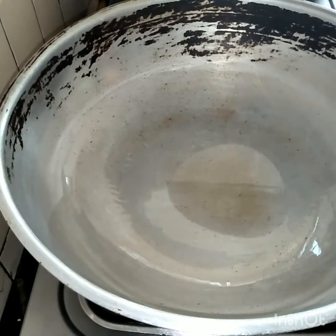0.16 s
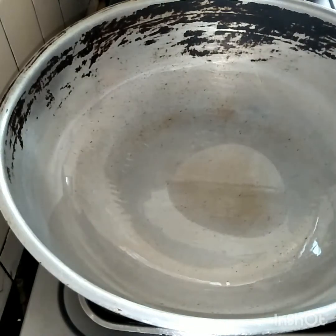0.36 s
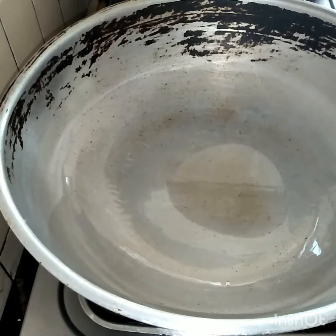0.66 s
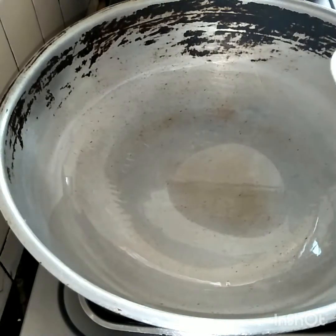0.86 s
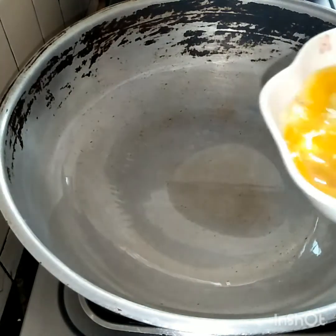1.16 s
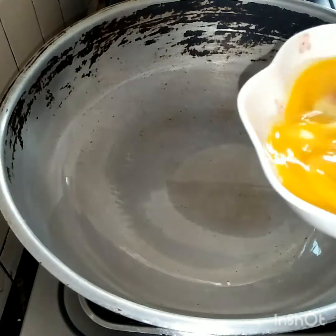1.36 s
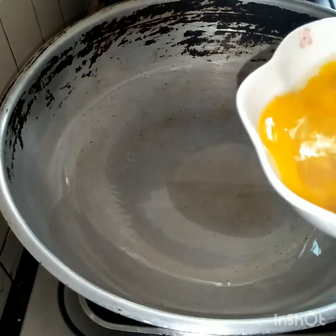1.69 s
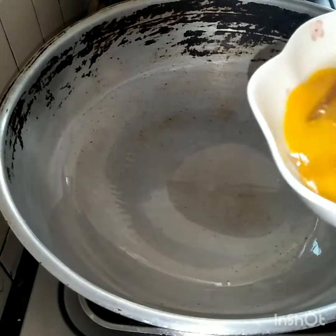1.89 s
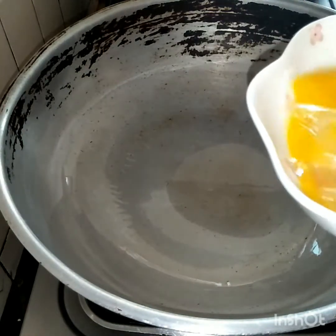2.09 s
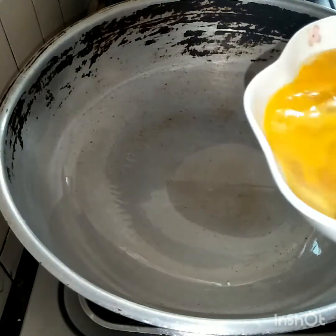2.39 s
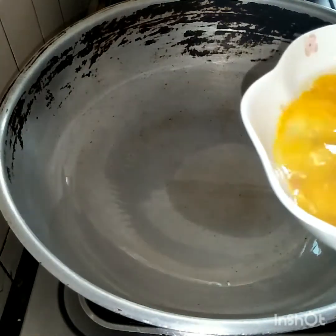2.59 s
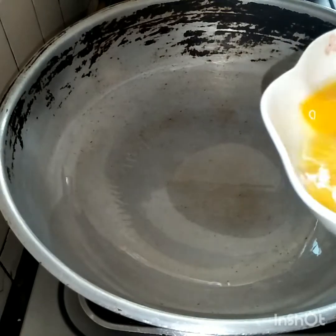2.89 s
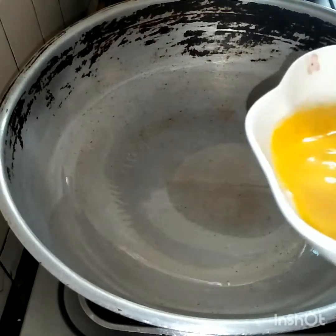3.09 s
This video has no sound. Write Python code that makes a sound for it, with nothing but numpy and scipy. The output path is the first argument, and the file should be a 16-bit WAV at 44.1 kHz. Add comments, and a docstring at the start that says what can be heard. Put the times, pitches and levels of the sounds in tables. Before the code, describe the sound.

First a muffled clatter further off and a faint high clink, then close, quick chopstick clacks on an egg-filled bowl with squelches and bubbles, in a small reverberant kitchen over low rumble and hum.

```python
"""Chopsticks beat raw eggs in a small ceramic bowl held over a wok, about six strokes a second.
Each stroke excites the damped modes of the bowl with two impacts and a brief noisy scrape.
Air pockets plop as gliding decaying tones; bubbles, squelches and tiny wet ticks fill in the egg.
A dish clinks in high modes, a clatter of coloured noise opens the scene further off, and thuds are soft.
The tiled kitchen adds echoes and a tail over wavering low hum, rumble and hiss."""
import sys
import numpy as np
from scipy import signal
from scipy.fft import rfft, irfft
from scipy.io import wavfile
from scipy.ndimage import uniform_filter1d

SR = 44100
rng = np.random.default_rng(int(sys.argv[2]) if len(sys.argv) > 2 else 0)


def materialize(psi):
    """Save the field psi as 16-bit PCM at rate SR to the path in sys.argv[1].

    A 1-D psi becomes a single channel; in a 2-D psi each row is a channel.
    """
    bounded = np.clip(np.atleast_2d(psi).T, -1, 1)
    quanta = np.round(bounded * 32767).astype(np.int16)
    wavfile.write(sys.argv[1], SR, quanta)


N = 143325  # length [samples]

# Levels are relative, ahead of the common gains (names in _DB) of each source.
# Chopstick strokes: t/s, stirring force/dB, level/dB in each of five bands,
# lowest bowl mode f/Hz, second stick level/dB, scrape level/dB
STROKES = [(0.806, -17, -41.5, -30.5, -28, -28, -35, 1196, 10, -1.5),
           (0.998, -15.5, -37.5, -32, -31, -29, -32.5, 1280, -5, -16),
           (1.202, -23, -88, -40.5, -33.5, -35, -42, 950, -2, -11),
           (1.35, -33, -47, -29.5, -29, -30, -39, 1190, -6.5, -32),
           (1.496, -9.5, -53.5, -34, -25.5, -33, -39, 974, -21, -28),
           (1.65, -15, -36, -28.5, -29, -30, -36, 1127, -11, -36),
           (1.818, -16.5, -32, -30, -40.5, -33, -36, 1265, -25, -22.5),
           (1.908, -15.5, -40.5, -37.5, -34, -37, -45.5, 1244, 4.5, -28),
           (1.994, -25, -33.5, -33, -28, -28, -45, 1094, -14, -17),
           (2.154, -16.5, -57, -36.5, -31, -35, -40.5, 1350, -11, -42),
           (2.305, -22, -78, -30, -27, -29.5, -36.5, 1270, 4, -28),
           (2.463, -10.5, -42, -28.5, -25.5, -27.5, -29, 1200, -5.5, -44),
           (2.621, -8, -47, -37, -31.5, -32, -41, 1265, 1, -36),
           (2.645, -12, -42.5, -39.5, -28.5, -33, -44, 1303, -2, -17.5),
           (2.783, -10.5, -45, -32, -32, -27.5, -32.5, 1340, -5, -17),
           (2.957, -13, -38.5, -27, -29.5, -27, -36.5, 995, 2.5, -46),
           (3.046, -25, -48.5, -46, -42.5, -43, -59, 1290, -21, -44),
           (3.125, -7, -39, -28.5, -27.5, -22.5, -28, 980, 2, -27)]
# Nominal edges of those five bands: f/Hz
STROKE_EDGES_HZ = [870, 1500, 2500, 3800, 7000, 16000]
STROKE_DB, SECOND_STICK_S, SCRAPE_S, ONSET_S = -4.5, 0.0039, 0.0024, 0.002
# Modes of the filled bowl, above the lowest one, which moves with the egg: f/Hz, level/dB, t60/s
BOWL_MODES = [(1828, -12.5, 0.062), (1926, -2, 0.027), (2110, -4.5, 0.025), (2948, 1, 0.023),
              (3260, -2, 0.037), (4620, -0.5, 0.012), (4910, 1.5, 0.012), (6240, -6, 0.0065)]
LOW_MODE_DB, LOW_MODE_T60_S = -9.5, 0.032
# Spectrum of the hard tick of wood on glaze: f/Hz, level/dB
TICK_COLOUR = [(800, -24.5), (3000, -22), (6000, -3), (7200, -9), (8300, 1), (9300, -1.5), (11200, -4.5),
               (12800, 6.5), (14200, -4), (16000, -7)]
TICK_DB, TICK_S = 6, 0.00089

# Small wet ticks between strokes: t/s, level/dB
DRIPS = [(1.212, -40), (1.2449, -37.5), (1.279, -36), (1.5233, -36), (1.980, -50), (2.021, -53),
         (2.140, -40), (2.1858, -43), (2.4954, -38), (2.531, -45), (2.8136, -40), (2.832, -35),
         (2.988, -35)]
# Spectrum of a wet tick: f/Hz, level/dB
DRIP_COLOUR = [(500, -40), (2000, -25), (4800, 10.5), (7500, -10), (13000, -3), (16000, -20)]
DRIP_S = 0.0015
# Air pockets in the egg: t/s, starting pitch f/Hz, level/dB, t60/s, initial relative pitch rise/(1/s)
PLOPS = [(1.002, 1795, -13.5, 0.029, 2.5), (1.029, 4280, -21.5, 0.023, 6), (1.244, 1930, -17, 0.053, 6.5),
         (1.2445, 2530, -8.5, 0.014, 4), (1.280, 3260, -13.5, 0.018, 18), (1.358, 1634, -25, 0.046, -8),
         (1.404, 2974, -20, 0.026, -2.5), (1.707, 1810, -21.5, 0.045, 8), (1.715, 2690, -23.5, 0.062, 5),
         (1.799, 1860, -31, 0.034, 1), (1.817, 1300, -21, 0.0067, 1), (1.829, 1324, -17.5, 0.025, 10),
         (1.9358, 1282, -12, 0.025, -1.5), (1.971, 2070, -24, 0.034, 33), (1.979, 3050, -4.5, 0.01, 13),
         (2.004, 1038, -23, 0.039, -3), (2.098, 3330, -14.5, 0.019, 10), (2.530, 2080, -18, 0.012, 4.2),
         (2.533, 4590, -17.5, 0.013, 5), (2.659, 2760, -7, 0.013, -7), (2.664, 4750, -23, 0.023, 1),
         (2.705, 1703, -29, 0.049, -1), (2.815, 4620, -24, 0.027, 2), (2.833, 4700, -13, 0.011, 5),
         (2.948, 1946, -24.5, 0.056, 2.7), (2.946, 2650, -27, 0.049, 1), (2.987, 2820, -22.5, 0.022, 3.8),
         (3.07, 1894, -26, 0.042, 1)]
PLOP_DB, PLOP_ATTACK_S, PLOP_GLIDE_S, PLOP_ROUGH = -2, 0.0017, 0.02, 0.25
# Spectrum of the snapping film of egg: f/Hz, level/dB
SNAP_COLOUR = [(300, -10), (1500, -30), (3000, 21.5), (5000, 4.5), (7000, -17), (13000, -2.5), (16000, -21)]
SNAP_DB, SNAP_S = -20, 0.0058
# Spectrum of the sloshing egg: f/Hz, level/dB
SLOSH_COLOUR = [(300, -13), (1000, -42), (1500, -24), (1900, 13.5), (2450, -14), (3100, 10), (3800, -6),
                (4800, 3), (7000, -15), (10000, -13.5), (13000, -20), (16000, -43)]
SLOSH_DB, SLOSH_REST_DB, BUBBLES_PER_S = -37.5, -34, 1300
SLOSH_LAG_S, SLOSH_WIDTH_S = 0.039, 0.029
# Squelches, clusters of tiny rising bubbles: t/s, length/s, centre f/Hz, level/dB
SQUELCHES = [(1.028, 0.075, 1850, -46.5), (1.274, 0.075, 3810, -40), (1.518, 0.019, 4340, -47),
             (1.687, 0.028, 4320, -42), (1.822, 0.097, 1670, -35), (2, .022, 1320, -46),
             (2.099, 0.0072, 3530, -25), (2.184, 0.023, 3340, -35.5), (2.489, 0.076, 2980, -58),
             (2.647, 0.023, 4400, -31), (2.672, 0.062, 1720, -44.5), (2.806, 0.027, 5200, -35.5),
             (2.968, 0.032, 2310, -35)]
SQUELCH_DB, SQUELCH_PER_S, SQUELCH_RISE_PER_S = -7.5, 900, 16.6
SQUELCH_SPREAD, SQUELCH_CYCLES = 0.136, 10  # pitch spread in log f; decay time in cycles

# Light clinks of a dish: t/s, level/dB, attack/s
CLINKS = [(0.4705, -28.5, 0.0026), (0.734, -46, 0.0095), (0.95, -53, 0.0012), (2.591, -42.5, 0.0014)]
# Modes of the dish: f/Hz, level/dB, t60/s
DISH_MODES = [(2990, -18, 0.11), (3637, 1.5, 0.049), (3884, 5, 0.046), (4770, -5.5, 0.089), (5200, 5, 0.05),
              (5460, 3, 0.067), (5560, 13, 0.038), (5730, 8, 0.038), (9700, 3, 0.025), (11200, 6.5, 0.024),
              (12700, 13, 0.027)]
# Distant clatter: t/s, level/dB, rise/s, decay/s, tilt/(dB per octave), factor on the colour's f
CLATTER = [(-.02, -25, 0.014, 0.04, -5.5, 0.89), (0.06, -33, 0.02, 0.02, -9, 0.88),
           (0.191, -21.5, 0.015, 0.032, 2.5, 1), (0.254, -34, 0.0056, 0.032, -2, 0.96),
           (.300, -38.5, 0.0029, 0.018, 1.5, 1)]
# Spectrum of the clatter at factor 1: f/Hz, level/dB
CLATTER_COLOUR = [(60, -38), (150, -11), (280, -7.5), (560, -11), (720, -2.5), (1050, 2), (1450, -6.5),
                  (1900, -1), (2500, -9.5), (3200, -9.5), (4200, -12.5), (5200, -16), (7000, -27),
                  (10700, -32), (16000, -48)]
# Resonances of the clatter: f/Hz, width/Hz, peak level/dB
CLATTER_RINGS = [(785, 55, 0), (1063, 21, 10.5), (1141, 55, 9), (2006, 23, 7), (2616, 57, 9.5),
                 (2744, 58, 5.5), (3415, 26, 7.5), (5200, 25, 5)]
# Soft low thuds: t/s, level/dB
THUDS = [(0.207, -38.5), (.240, -35), (0.289, -43), (0.852, -50), (1.635, -49), (1.791, -51.5)]
# Spectrum of a thud: f/Hz, level/dB
THUD_COLOUR = [(40, -13), (90, 11), (170, -0.5), (260, 9), (400, -21), (800, -40), (16000, -90)]
THUD_RISE_S = 0.011

# Decay and colour of the kitchen's reverberation: f/Hz, t60/s, level/dB
ROOM = [(298, 0.28, 1), (1060, 0.19, -2.5), (1850, 0.25, -4.5), (2500, 0.15, 0), (3220, 0.38, -9),
        (4470, 0.43, -13), (7700, 0.51, -17.5), (12800, 0.28, -10)]
ECHO_DB, ECHO_S, ROOM_ONSET_S = -7.5, 0.013, 0.024
CLINK_ROOM_DB, CLATTER_ROOM_DB, ROOM_WIDTH_DB = 3.5, -5, -9
# Share of the room's sound scattered into a grainy wash: f/Hz, share (0-1)
DIFFUSION = [(2800, 0), (3600, .12), (5000, .15), (6300, .7), (16000, .9)]
GRAIN_DB = 1.3
# Mains hum, relative to its swell: f/Hz, level/dB
HUM = [(60, 1.5), (120, -12.5), (241, -22.5)]
# Swell of the hum: t/s, level/dB
HUM_SWELL = [(0.0, -39), (0.11, -35.5), (0.38, -53), (0.4, -43), (0.63, -33), (0.7, -46), (1.13, -36.5),
             (1.18, -44.5), (1.7, -38.5), (1.76, -47.5), (1.87, -37.5), (1.92, -45.5), (2.37, -36.5),
             (2.43, -50), (2.71, -36), (2.93, -45.5), (3.18, -37.5), (3.25, -41)]
HUM_WAVER_DB, HUM_WAVER_HZ, HUM_DRIFT_RAD = 2, 8.1, 0.47
# Spectrum of the rumble and hiss: f/Hz, level/dB
FLOOR_COLOUR = [(20, -22), (35, 7.5), (55, 2.5), (90, 5), (160, 4.5), (210, -7), (280, -17), (380, -22),
                (600, -23.5), (1200, -27), (2500, -30.5), (5000, -42.5), (10000, -43.5), (16000, -38.5)]
FLOOR_DB = -44
# Stereo width: f/Hz, side level/dB
WIDTH = [(2800, -80), (4000, -35), (5200, -11), (6500, -5), (16000, -6)]
EDGE_HZ = 16000


def amp(db):
    """Amplitude gain follows from level as 10^(level/20)."""
    return 10 ** (np.asarray(db) / 20)


def unit(x):
    """Normalisation to unit root-mean-square amplitude."""
    return x / np.sqrt(np.mean(x ** 2) + 1e-20)


def read(points, hz):
    """Linear interpolation on a logarithmic frequency axis."""
    f, value = np.transpose(points)
    return np.interp(np.log(hz + 1), np.log(f + 1), value)


def colour(x, points, tilt_db=0):
    """Spectral weighting by a table, with an added tilt per octave."""
    hz = np.fft.rfftfreq(x.shape[-1], 1 / SR)
    level_db = read(points, hz) + tilt_db * np.log2((hz + 200) / 1000)
    return irfft(rfft(x) * amp(level_db), x.shape[-1])


def add(mix, s, sound):
    """Linear superposition of a sound from time s on."""
    part = mix[..., max(round(s * SR), 0):][..., :sound.shape[-1]]
    part += sound[..., :part.shape[-1]]


def wander(hz):
    """Slow random fluctuation: noise under a Gaussian low-pass, without its mean."""
    f = np.fft.rfftfreq(N, 1 / SR)
    lowpass = np.exp(-(f / hz) ** 2) * (f > 0)
    return unit(irfft(rfft(rng.standard_normal(N)) * lowpass, N))


def ring(modes, t, spread=0.018, vary_db=2.5):
    """Modal superposition: damped sines, a little different in pitch and strength at each touch."""
    out = np.zeros(len(t))
    for hz, db, t60 in modes:
        touch_db = db + vary_db * rng.standard_normal()
        touch_hz = hz * (1 + spread * rng.standard_normal())
        out += amp(touch_db - 60 * t / t60) * np.sin(2 * np.pi * (touch_hz * t + rng.random()))
    return out


def chopsticks():
    """Impact excitation: noise swells briefly, then two impacts and a scrape ring the bowl's modes."""
    out, t = np.zeros((2, N)), np.arange(4096) / SR
    lead = 256  # samples of rising noise before the first impact
    since = t - lead / SR
    for s, _, *levels, low_hz, second_db, scrape_db in STROKES:
        # excitation: noisy onset and scrape, with an impulse for each stick
        envelope = np.exp(-np.maximum(since / SCRAPE_S, -since / ONSET_S))
        contact = amp(scrape_db) * rng.standard_normal(len(t)) * envelope
        contact[lead] += 1
        second_s = lead / SR + SECOND_STICK_S * rng.uniform(0.555, 1.2)
        add(contact, second_s, amp(second_db) * np.array([.5, .5]))

        modes = [(low_hz, LOW_MODE_DB, LOW_MODE_T60_S), *BOWL_MODES]
        body = np.array([ring(modes, t), ring(modes, t)])
        ringing = signal.fftconvolve(body, contact[None], axes=1)[:, :len(t)]

        # the tick follows the excitation, smoothed by a decaying memory
        pressure = np.sqrt(signal.lfilter([1], [1, -np.exp(-2 / (TICK_S * SR))], contact ** 2))
        tick = unit(colour(rng.standard_normal(body.shape), TICK_COLOUR)) * pressure
        clack = ringing + amp(TICK_DB) * tick

        # each band is set to its own level
        for lo, hi, db in zip(STROKE_EDGES_HZ, STROKE_EDGES_HZ[1:], levels):
            band_filter = signal.butter(3, [lo * 1.05, hi * .95], "band", fs=SR, output="sos")
            band = signal.sosfilt(band_filter, clack)
            band = band / band[:, :1024].std(1, keepdims=True)
            add(out, s - lead / SR, amp(db + STROKE_DB) * band)
    return out


def drips():
    """Impulsive noise: threads of egg snap and droplets tick on the bowl, dying exponentially."""
    out, t = np.zeros((2, N)), np.arange(1024) / SR
    for s, db in DRIPS:
        tick = colour(rng.standard_normal((2, len(t))), DRIP_COLOUR)
        add(out, s, amp(db) * unit(tick) * np.exp(-t / DRIP_S))
    return out


def plops():
    """Bubble resonance: a film of egg snaps and the air pocket rings roughly, gliding in pitch."""
    out, t = np.zeros((2, N)), np.arange(3000) / SR
    for s, hz, db, t60, rise in PLOPS:
        # the glide levels off after PLOP_GLIDE_S
        pitch = hz * (1 + rise * PLOP_GLIDE_S * np.tanh(t / PLOP_GLIDE_S))
        envelope = amp(-60 * t / t60) * (1 - np.exp(-t / PLOP_ATTACK_S))
        roughness = unit(uniform_filter1d(rng.standard_normal(len(t)), size=50))
        tone = np.sin(2 * np.pi * np.cumsum(pitch) / SR) * envelope * (1 + PLOP_ROUGH * roughness)
        snap_noise = unit(colour(rng.standard_normal((2, len(t))), SNAP_COLOUR))
        snap = amp(SNAP_DB) * snap_noise * np.exp(-t / SNAP_S)
        add(out, s, amp(db + PLOP_DB) * snap)
        add(out[0], s, amp(db + PLOP_DB) * tone)
    return out


def slosh(size_db=3, follow=0.72, full_db=-4):
    """Random impulse train: tiny bubbles crackle as the sticks drag through the egg after each stroke."""
    t = np.arange(N) / SR
    drags = []
    for s, force_db, *_ in STROKES:
        pulse = np.exp(-((t - s - SLOSH_LAG_S) / SLOSH_WIDTH_S) ** 2)
        drags.append(amp(follow * (force_db - full_db)) * pulse)
    # a steady remainder fades in over 0.47 s from the first stroke
    rest = amp(SLOSH_REST_DB) * np.clip((t - STROKES[0][0]) / 0.47, 0, 1)
    drag = np.max(drags, axis=0) + rest
    bursts = rng.random(N) < BUBBLES_PER_S / SR
    sizes = amp(size_db * np.minimum(rng.exponential(1, N), 3))
    pops = bursts * sizes * rng.choice([-1, 1], (2, N))
    return amp(SLOSH_DB) * drag * unit(colour(pops, SLOSH_COLOUR))


def squelches():
    """Bubble chirps: egg pulled by the sticks tears into clusters of bubbles, each rising in pitch."""
    out, t = np.zeros(N), np.arange(1024) / SR
    for s, length, centre_hz, db in SQUELCHES:
        cluster, draws = np.zeros(8192), rng.random((64, 3))
        count = max(int(SQUELCH_PER_S * length), 2)
        for when, pitch, size in draws[:count]:
            hz = centre_hz * np.exp(SQUELCH_SPREAD * (4 * pitch - 2))
            life = t * hz / SQUELCH_CYCLES
            chirp = np.sin(2 * np.pi * hz * (t + SQUELCH_RISE_PER_S * t ** 2 / 2))
            envelope = np.exp(-life) * np.minimum(life * 2, 1)
            add(cluster, when * length, (.5 + size) * chirp * envelope)
        # equal energy per second of cluster length
        cluster *= np.sqrt(length * SR / np.sum(cluster ** 2))
        add(out, s, amp(db + SQUELCH_DB) * cluster)
    return out


def clinks(tick_db=9, tick_s=0.0062):
    """Modal ringing: a dish is touched lightly and rings high, with a short tick of treble noise."""
    out, t = np.zeros((2, N)), np.arange(8000) / SR
    highpass = signal.butter(8, 3400, "high", fs=SR, output="sos")
    for s, db, attack in CLINKS:
        tick = signal.sosfilt(highpass, rng.standard_normal((2, len(t)))) * np.exp(-t / tick_s)
        body = np.array([ring(DISH_MODES, t, spread=0.0058), ring(DISH_MODES, t, spread=0.0055)])
        sound = (body + amp(tick_db) * tick) * np.minimum(t / attack, 1) ** 2
        add(out, s, amp(db - 6) * sound / sound[:, :512].std())
    return out


def clatter(grain=0.27):
    """Resonant filtering of noise bursts: dull, rattling knocks further off in the kitchen."""
    out, hz = np.zeros(N), np.fft.rfftfreq(N, 1 / SR)
    rings = 1 + sum((amp(db) - 1) / (1 + 2j * (hz - f) / width) for f, width, db in CLATTER_RINGS)
    for s, db, rise, decay, tilt, pitch in CLATTER:
        t = np.maximum(np.arange(N) / SR - s, 0)
        noise = rng.standard_normal(N) * np.exp(grain * wander(230))
        rattle = unit(colour(noise, np.array(CLATTER_COLOUR) * [pitch, 1], tilt))
        envelope = np.minimum(t / rise, 1) * np.exp(-np.maximum(t - rise, 0) / decay)
        out += amp(db - 1.5) * rattle * envelope
    return irfft(rfft(out) * rings, N)


def thuds():
    """Low-frequency noise pulses: soft bumps under the clatter and the beating."""
    out, u = np.zeros(N), np.arange(8192) / SR / THUD_RISE_S
    for s, db in THUDS:
        bump = colour(rng.standard_normal(len(u)), THUD_COLOUR) * u * np.exp(-u)
        add(out, s, amp(db) * bump / bump[:2048].std())
    return out


def kitchen(x, count=3):
    """Convolution reverberation: quick echoes off the wok and a tiled-room tail, shifting as the bowl moves."""
    size = 24576
    t, out, table = np.arange(size) / SR, np.zeros((2, N)), np.array(ROOM)
    for k in range(count):
        # tail: sparse random reflections, decaying at a rate set by frequency
        taps = rng.standard_normal((2, size)) * (rng.random((2, size)) < .1)
        hz, at, z = signal.stft(taps, SR, nperseg=256)
        decay = amp(-60 * at / read(table[:, :2], hz)[:, None])
        tail = signal.istft(z * decay, SR, nperseg=256)[1][:, :size] * np.minimum(t / ROOM_ONSET_S, 1)
        tail = colour(unit(tail), table[:, ::2]) * (t < t[-1] * .9)

        reflections = rng.standard_normal((2, size)) * (rng.random((2, size)) < .15)
        echoes = unit(reflections * (t / ECHO_S) * np.exp(-3 * t / ECHO_S))
        response = (tail + amp(ECHO_DB) * echoes) / np.sqrt(size)

        # the responses take turns, going round twice a second
        share = np.maximum(np.cos(2 * np.pi * (2 * np.arange(N) / SR - k / count)), 0)
        out += signal.fftconvolve(x * share, response, axes=1)[:, :N]
    return out


def diffuse(x):
    """Diffuse scattering: many reflections blur the treble rings into a grainy wash."""
    hz, _, z = signal.stft(x, SR, nperseg=128)
    noise = signal.stft(rng.standard_normal(x.shape), SR, nperseg=128)[2]
    power = abs(uniform_filter1d(abs(z) ** 2, size=3, axis=1))
    grain_level = unit(uniform_filter1d(rng.standard_normal(z.shape[1:]), size=12, axis=0))
    grain = unit(amp(GRAIN_DB * grain_level))
    share = read(DIFFUSION, hz)[:, None]
    wash = np.sqrt(share * power) * grain * noise / noise.std()
    return signal.istft(z * np.sqrt(1 - share) + wash, SR, nperseg=128)[1][:, :N]


def background():
    """Modulated harmonics and stationary noise: wavering mains hum over rumble and faint hiss."""
    t, hum = np.arange(N) / SR, np.zeros(N)
    swell_db = np.interp(t, *np.transpose(HUM_SWELL))
    for hz, db in HUM:
        level = amp(swell_db + db + HUM_WAVER_DB * wander(HUM_WAVER_HZ))
        phase = 2 * np.pi * hz * t + HUM_DRIFT_RAD * wander(HUM_WAVER_HZ)
        hum += level * np.sqrt(2) * np.sin(phase)
    return hum + amp(FLOOR_DB) * unit(colour(rng.standard_normal(N), FLOOR_COLOUR))


def scene():
    """Mid-side superposition: sticks, drips, dish and room have width, chiefly in the treble."""
    sticks = chopsticks() + drips()
    wet = plops() + slosh() + squelches()
    dish, far = clinks(), clatter()
    hard = sticks + dish
    near_room = diffuse(kitchen(sticks + wet + amp(CLINK_ROOM_DB) * dish))
    room = near_room + kitchen(amp(CLATTER_ROOM_DB) * far[None])
    mid = hard[0] + wet[0] + room[0] + far + thuds() + background()
    side = colour(hard[1] + amp(ROOM_WIDTH_DB) * room[1], WIDTH)
    return np.array([mid + side, mid - side])


def record(dry):
    """Band limitation: a symmetric low-pass filter removes the top of the spectrum."""
    lowpass = signal.firwin(255, EDGE_HZ, window=("kaiser", 9), fs=SR)
    return signal.oaconvolve(dry, lowpass[None], "same")


dry = scene()
out = record(dry)
materialize(out)
```